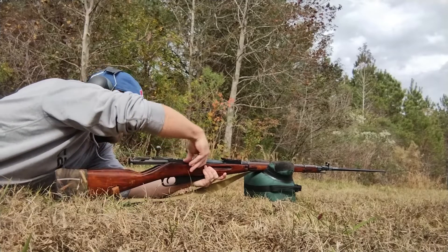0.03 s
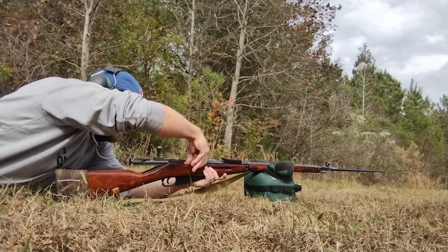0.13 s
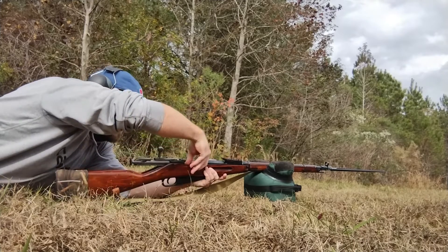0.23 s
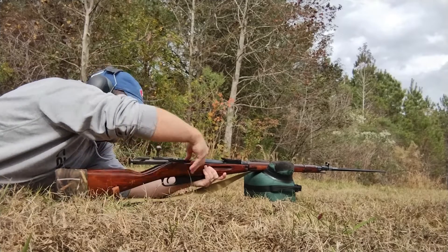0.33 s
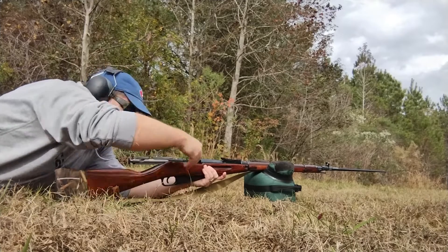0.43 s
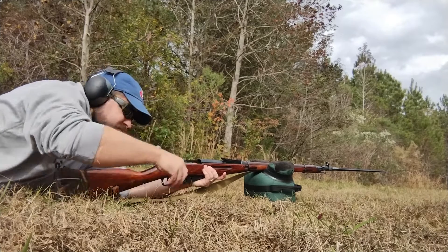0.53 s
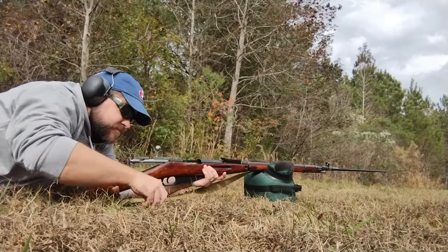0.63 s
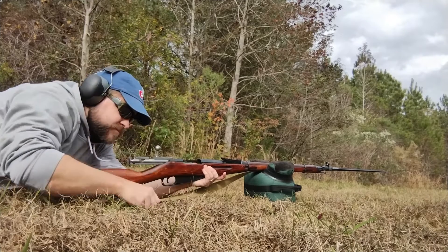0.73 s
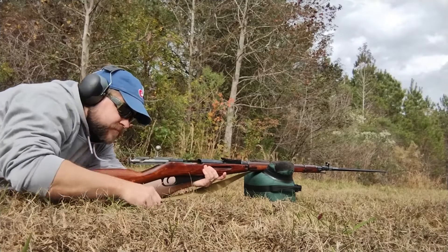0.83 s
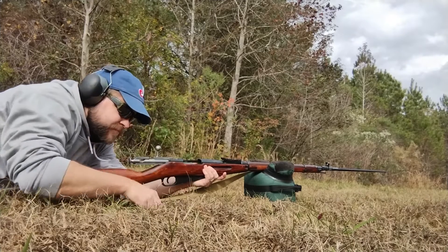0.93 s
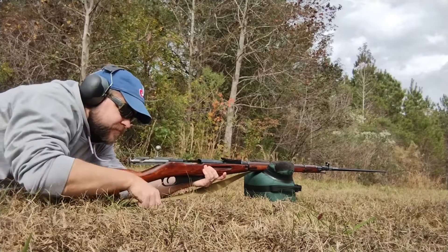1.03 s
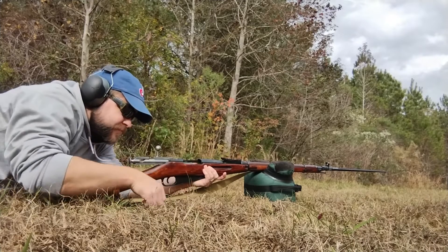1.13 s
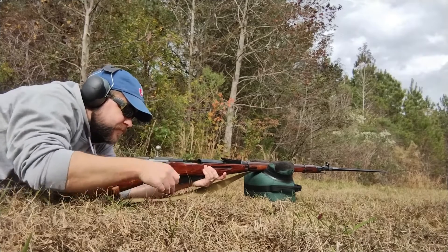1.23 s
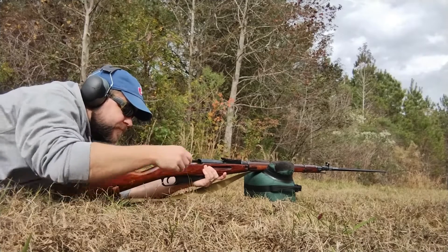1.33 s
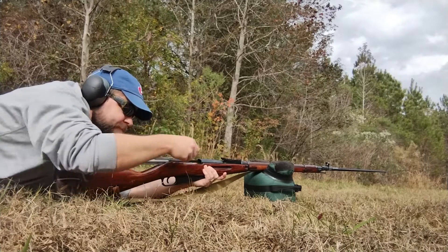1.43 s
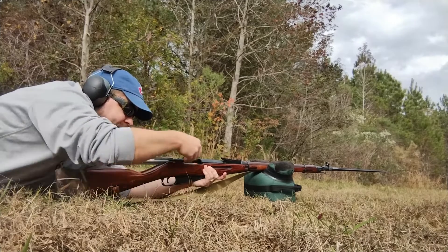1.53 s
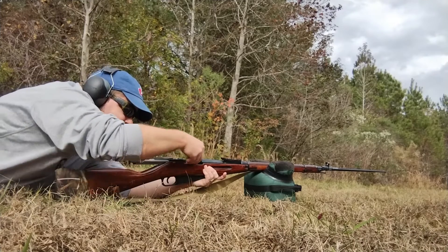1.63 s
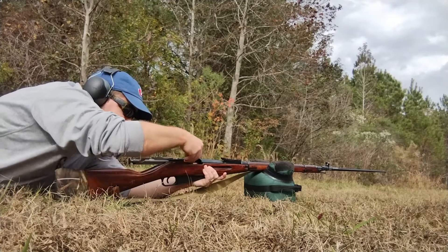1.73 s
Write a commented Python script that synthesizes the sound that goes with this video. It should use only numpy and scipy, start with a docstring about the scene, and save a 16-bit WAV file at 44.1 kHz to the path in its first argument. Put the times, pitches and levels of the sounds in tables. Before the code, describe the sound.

A rifle bolt clacks sharply in a quick metallic burst outdoors, then near quiet with faint hum

```python
"""A rifle bolt is worked outdoors close by: short runs of steel contacts, each a burst of noise and tone through
resonances, ring the action and knock the wooden stock, and a faint broad echo follows the main run; decaying
noise tails answer from ground and tree line. A far propeller engine hums as a sum of harmonic orders. An insect
ticks steadily in the grass, by filtered noise bursts, among weaker random ticks. Behind lie faint shaped noises:
air hiss, rumble and breeze."""
import sys
import numpy as np
from scipy import signal
from scipy.fft import rfft, irfft, next_fast_len
from scipy.io import wavfile
from scipy.ndimage import uniform_filter1d, minimum_filter1d, map_coordinates

SR = 44100
rng = np.random.default_rng(int(sys.argv[2]) if len(sys.argv) > 2 else 0)


def wrap_up_sound(samples):
    """Save the sound to the file named by the first command line argument, as 16-bit audio."""
    columns = np.atleast_2d(samples).T
    # keep every value between -1 and 1, then stretch to whole-number steps
    tamed = np.clip(columns, -1, 1)
    steps = np.round(tamed * 32767).astype(np.int16)
    wavfile.write(sys.argv[1], SR, steps)


def volts(x):
    """Linear amplitude factor 10**(x/20) for a level x in dB, scalar or array-like."""
    e = np.asarray(x, float) / 20
    return 10 ** e


N = 77175  # samples
SIDE = np.array([[.5], [-.5]])  # splits a left-over-right difference between the two ports


def unit(x):
    """Normalisation to rms 1."""
    return x / np.sqrt(np.mean(x ** 2) + 1e-20)


def along(points, hz):
    """Interpolation of (frequency [Hz], value) points on a logarithmic frequency axis."""
    f, v = np.transpose(points)
    return np.interp(np.log(hz + 1), np.log(f + 1), v)


def wobble(rate):
    """Slow random modulation: a spline through normal random knots, rate of them a second."""
    knots = rng.standard_normal(int(N * rate / SR) + 4)
    return map_coordinates(knots, [np.arange(N) * rate / SR])


def filtered(x, response):
    """Linear filtering: the spectrum is multiplied by a complex frequency response."""
    m = next_fast_len(N + SR // 2)
    return irfft(rfft(x, m) * response(np.fft.rfftfreq(m, 1 / SR)), m)[..., :N]


def resonant(x, peaks, order):
    """Modal resonance: a causal sum of modes, applied order times, that keeps the rms of white noise."""
    def gain(f):
        total = 0
        for k, (centre, width, db) in enumerate(peaks):
            mode = 1j * f * width / (centre * centre - f * f + 1j * f * width)
            total = total + (-1) ** k * volts(db / order) * mode  # neighbours have opposite sign
        total = total ** order
        return total / np.sqrt(np.mean(np.abs(total) ** 2))
    return filtered(x, gain)


def noise(events):
    """Broadband excitation: ten milliseconds of white noise per event."""
    return rng.standard_normal((len(events), SR // 100))


def bursts(times, levels_db, length, wave):
    """Impulsive excitation: one row of wave per event, with a fast rise and a Gaussian fall."""
    u = np.arange(wave.shape[1]) / SR / length
    at = np.round(times * SR).astype(int)[:, None] + np.arange(wave.shape[1])
    shape = np.sqrt(u) * np.exp(-u ** 2)
    # equal energy at equal level, whatever the wave
    size = volts(levels_db) * np.linalg.norm(shape) / np.linalg.norm(shape * wave, axis=1)
    return np.bincount(at.ravel(), (size[:, None] * shape * wave).ravel(), N + SR)[:N]


# steel contacts and, from 0.2545 to 0.2700 s, a faint broad echo of the main burst; level offsets are further
# set by each part's own gain: (time before the common shift [s], level [dB], bright part re level [dB],
# stock knock re level [dB], receiver pitch [Hz])
CONTACTS = [(0.0398, -43, 0, -22, 4560), (0.0409, -35.5, -14, -26, 4400), (0.0722, -26, -8, -26.5, 3860),
            (0.0748, -27, -19, -28.5, 4090), (0.0779, -38, -14.5, -22.5, 3800),
            (0.0806, -38, -10, -22.5, 3850), (0.0824, -34, -8, -22.5, 4000), (0.0842, -33, -5, -19.5, 4640),
            (0.0862, -35, -8, -19, 4900), (0.0884, -33, -4.5, -21.5, 4870),
            (0.0924, -29.5, -15.5, -22.5, 4420), (0.0959, -36, -13.5, -17.5, 5020),
            (0.0994, -44.5, -17.5, -18.5, 3940), (0.1028, -44, -14, -16.5, 3720),
            (0.1094, -58, -10.5, -12, 5040), (0.1908, -46, -6, -3.5, 4570), (0.195, -46, -11.5, -12, 4380),
            (0.1999, -25.5, -10, -15, 4317), (0.202, -27, -2.5, -21, 4348),
            (0.2039, -11.5, -3.5, -29, 4281), (0.2058, -6, -7.5, -26.5, 4609),
            (0.2076, -3.5, -13.5, -24, 4040), (0.2098, -6.5, -12, -23, 4628), (0.2128, -16, -12, -26, 3890),
            (0.2159, -18.5, -10.5, -19.5, 4484), (0.2196, -17, -6, -17, 4653),
            (0.2214, -8.5, -7, -23, 4252), (0.2236, -12.5, -4, -25, 3606), (0.2281, -17, -10, -21.5, 5031),
            (0.2289, -22.5, -7, -26, 4108), (0.232, -17, -10.5, -29.5, 4680),
            (0.2346, -22, -6.5, -23.5, 3599), (0.2389, -27.5, -11, -13, 3280),
            (0.2427, -29.5, -11.5, -16, 3802), (0.2479, -35.5, -8.5, -14.5, 3952),
            (0.2545, -43, -1.5, -11, 3600), (0.261, -47, 0.5, -7, 4330), (0.2700, -50.5, -1.5, -7.5, 3720),
            (0.3706, -51.5, -16, -14, 3860), (0.3785, -49, -21, -13, 3910),
            (0.3909, -28, -10.5, -15.5, 4505), (0.3938, -36.5, -20, -44, 4330),
            (0.3965, -35, -7, -19.5, 4280), (0.3983, -38.5, -16, -27, 4500),
            (0.3999, -27.5, -11, -22, 4768), (0.4054, -49, -25, -5, 4257), (0.4124, -53, -16, -7, 4955),
            (0.4164, -64, -24, -30, 4546), (1.5505, -68, -6, -16, 4130)]


def bolt():
    """Impact excitation: every row drives the small parts, the receiver and the stock."""
    s, db, bright_db, stock_db, hz = np.transpose(CONTACTS)
    s = s + .0002  # common shift, s
    receiver_s = s + 0.00054  # the receiver speaks a moment later
    return ping(receiver_s, db, hz) + scrape(receiver_s, db) + snap(s, db + bright_db) + knock(s, db + stock_db)


STEEL_S = .0014  # burst length of ping and scrape
# the receiver radiates little bass: (frequency [Hz], width per pass [Hz], relative level [dB])
PING_BAND = [(3987, 4000, 0)]


def ping(s, db, hz):
    """Tonal ringing with phase diffusion: a random walk of phase broadens each sinusoid."""
    PING_DB, WAVER = -8.5, 0.12  # waver: rms radians a sample
    phase = 2 * np.pi * hz[:, None] * np.arange(SR // 100) / SR
    wave = np.sin(phase + WAVER * np.cumsum(noise(s), axis=1))
    return resonant(bursts(s, db + PING_DB, STEEL_S, wave), PING_BAND, order=2)


# modes of the receiver as a whole: (frequency [Hz], width per pass [Hz], relative level [dB])
STEEL = [(2652, 1200, -2.5), (3700, 900, 3.5), (5230, 860, -3)]


def scrape(s, db):
    """Friction noise coloured by the modes of the receiver."""
    SCRAPE_DB = -8
    return resonant(bursts(s, db + SCRAPE_DB, STEEL_S, noise(s)), STEEL, order=2)


# modes of the small bolt parts: (frequency [Hz], width [Hz], relative level [dB])
BRIGHT = [(6420, 3900, -4), (7750, 1700, 3), (10065, 500, -3), (12250, 1800, -0.5), (13400, 3800, -5)]


def snap(s, db):
    """Modal radiation of small parts: their high, broad modes turn the impact noise into a bright snap."""
    SNAP_DB, SNAP_S = 6.5, 0.0013
    return resonant(bursts(s, db + SNAP_DB, SNAP_S, noise(s)), BRIGHT, order=1)


# modes of the wooden stock: (frequency [Hz], width [Hz], relative level [dB]); grip() uses the lowest three
STOCK = [(390, 160, -3), (560, 66, 3), (735, 200, -3.5), (990, 200, -2.5), (1337, 200, 2.5)]
# the wood radiates little treble: (frequency [Hz], width per pass [Hz], relative level [dB])
STOCK_BAND = [(750, 1170, 0)]


def knock(s, db):
    """Structure-borne sound: the impact excites the modes of the wood, which radiates a limited band."""
    KNOCK_DB, KNOCK_S = -4.5, 0.0015
    wood = resonant(bursts(s, db + KNOCK_DB, KNOCK_S, noise(s)), STOCK, order=1)
    return resonant(wood, STOCK_BAND, order=2)


# a hand settles on the stock: (time [s], level [dB])
GRIP = [(1.734, -57.5), (1.742, -58.5)]


def grip():
    """Soft impact: longer bursts in the lowest modes of the wood alone."""
    s, db = np.transpose(GRIP)
    return resonant(bursts(s, db, .005, noise(s)), STOCK[:3], order=2)


def radiated(x):
    """Radiation efficiency: a small source is a weak bass radiator, here a second-order high-pass."""
    LOW_HZ = 199.9
    return filtered(x, lambda hz: (1j * hz / (LOW_HZ + 1j * hz)) ** 2)


# level difference between the ports: (frequency [Hz], left over right [dB])
HIT_BALANCE = [(60, -3), (180, -4), (550, -1.5), (1650, 3.5), (4970, 2.5), (15000, 7.5)]
# phase difference between the ports: (frequency [Hz], left lead [radians])
LEFT_LEAD = [(500, 1.7), (1400, 0.63), (2800, 0.36), (5600, 0.94), (11000, 1.3)]


def direct(steel, unlike):
    """Interaural-type cues: level and phase differences, and a part that is opposite at the two ports."""
    UNLIKE_DB = -12.5

    def port(hz):
        return volts(SIDE * along(HIT_BALANCE, hz)) * np.exp(1j * SIDE * along(LEFT_LEAD, hz))
    return filtered(steel + 2 * SIDE * volts(UNLIKE_DB) * unlike, port)


def echo(x, t60s, delay_s):
    """Diffuse reverberation: convolution with a half-second noise tail, each frequency decaying at its t60."""
    hz, t, z = signal.stft(rng.standard_normal((2, SR // 2)), SR, nperseg=128)
    tail = signal.istft(z * volts(-60 * t / along(t60s, hz)[:, None]), SR, nperseg=128)[1]
    delayed = np.pad(x, (round(delay_s * SR), 0))[None]
    return signal.fftconvolve(delayed, tail / np.linalg.norm(tail[0]), axes=1)[:, :N]


# first scatter off grass and hands: (frequency [Hz], t60 [s])
GROUND = [(1000, 0.017)]


def ground(steel):
    """Early scattering: a very short diffuse tail just behind the direct sound."""
    return volts(-10.5) * echo(steel, GROUND, 0.00044)


# ground and rest: (frequency [Hz], t60 [s])
NEAR = [(300, 0.13), (1400, .1), (4000, 0.21), (14000, 0.062)]


def near(steel):
    """Local reverberation: a diffuse tail from the near surroundings."""
    return volts(-21.5) * echo(steel, NEAR, 0.0026)


# decay of the tree line: (frequency [Hz], t60 [s])
TREES = [(300, .7), (1500, 1.0), (4000, 1.0), (8000, 0.86), (14000, 0.15)]
# what the trees send back: (frequency [Hz], gain [dB])
TREES_COLOUR = [(500, -2), (2000, 2.5), (4200, -5), (5800, 2), (7800, 2), (14000, -2.5)]


def trees(steel):
    """Frequency-dependent scattering: the tree line colours the sound and returns it as a long tail."""
    sent_back = filtered(steel, lambda hz: volts(along(TREES_COLOUR, hz)))
    return volts(-40) * echo(sent_back, TREES, 0.013)


def blurred(x):
    """Phase modulation by moving scatterers: stirring leaves and grass let no pitch last."""
    WAVER, RATE = 3, 150  # radians rms at the knots, knots a second
    drift = WAVER * np.array([wobble(RATE), wobble(RATE)])
    return np.real(signal.hilbert(x, next_fast_len(N))[:, :N] * np.exp(1j * drift))


# engine orders, all raised 1 dB in engine(): (multiple of the pulse rate, level before the turn [dB],
# level after it [dB])
ENGINE = [(1, -93.5, -87), (2, -70.5, -70), (3, -63.5, -62), (4, -71.5, -66.5), (4.5, -88.5, -75),
          (5, -88, -90), (6, -66.5, -72), (7, -91.5, -83)]


def engine():
    """Harmonic synthesis: orders of one pulse train, whose balance shifts as the far engine turns."""
    PULSE_HZ, FIRST_PULSE_S, TURN_S, TURN_WIDTH_S = 45.5, 0.0097, 1.25, 0.078
    t = np.arange(N) / SR
    turned = 1 / (1 + np.exp((TURN_S - t) / TURN_WIDTH_S))
    cycle = 2 * np.pi * PULSE_HZ * (t - FIRST_PULSE_S)
    tone = np.zeros(N)
    for multiple, before, after in ENGINE:
        level = volts(before + (after - before) * turned + 1 + 0.5 * wobble(3.9))
        tone += level * np.cos(multiple * cycle + .25 * wobble(4.8))
    port_level = np.array([volts(0.74 * wobble(2.0)), volts(0.54 * wobble(3.6))])
    return tone * port_level * volts([[-.6], [.6]])


# resonances of the ticks: (frequency [Hz], width per pass [Hz], relative level [dB])
TICK = [(12400, 830, -10.5), (12700, 1500, 6), (16400, 2700, -1)]


def insects():
    """Resonant radiation of pulse trains: one periodic ticker, and weaker ticks at random times."""
    PERIOD_S, FIRST_S, TICK_DB, LEFT_OVER_RIGHT_DB = .03421, .0112, -63, 6
    STRAY_PER_S, STRAY_DB = 69, -68.5  # the lowest stray level; it ranges 7 dB upward
    steady = np.arange(FIRST_S, N / SR, PERIOD_S)
    level = TICK_DB + 2.2 * rng.standard_normal(len(steady))
    ticker = bursts(steady, level, 0.0011, noise(steady))
    draw = rng.random((round(STRAY_PER_S * N / SR), 2))
    stray = bursts(draw[:, 0] * N / SR, STRAY_DB + 7 * draw[:, 1], 0.00088, noise(draw))
    return resonant(ticker + stray, TICK, order=2) * volts(SIDE * LEFT_OVER_RIGHT_DB)


def hiss(spectrum, shared):
    """Partial coherence: stereo noise of rms 1, a share of its power common to both ports."""
    a = rng.standard_normal((3, N))
    mixed = np.sqrt(shared) * a[0] + np.sqrt(1 - shared) * a[1:]
    return unit(filtered(mixed, lambda hz: volts(along(spectrum, hz))))


# air hiss spectrum: (frequency [Hz], relative level per Hz [dB])
AIR = [(180, -32), (300, -4.5), (321, -12.5), (366, -13), (645, -17.5), (713, -18), (978, -21.5),
       (10000, -28), (13500, -27), (16000, -24.5)]
# rumble spectrum: (frequency [Hz], relative level per Hz [dB])
RUMBLE = [(15, -50.5), (28, -32.5), (45, -21.5), (70, -3.5), (110, -1), (200, -6), (300, -14.5),
          (500, -30.5), (800, -91.5)]
# far insects lift the left treble: (frequency [Hz], left over right [dB])
AIR_LEFT = [(9000, 0.5), (13000, 6.5)]


def air():
    """Partially coherent noise fields: nearly incoherent hiss that slowly fades, and coherent rumble."""
    AIR_DB, FADE_DB_PER_S, RUMBLE_DB = -70, 2.5, -70
    air_level = volts(AIR_DB - FADE_DB_PER_S * np.arange(N) / SR + 0.55 * wobble(3))
    rumble_level = volts(RUMBLE_DB + 1.5 * wobble(4.3))
    both = air_level * hiss(AIR, 0.027) + rumble_level * hiss(RUMBLE, 0.82)
    return filtered(both, lambda hz: volts(SIDE * along(AIR_LEFT, hz)))


# breeze on each port: (frequency [Hz], relative level per Hz [dB])
BUFFET = [(12, -22), (25, -0.5), (45, -5.5), (80, -30), (150, -88.5)]


def buffet():
    """Turbulent pressure: low noise of the breeze, mostly incoherent between the ports."""
    return volts(-87 + 1.8 * wobble(7)) * hiss(BUFFET, 0.12)


def scene():
    """Superposition: all sources add at the two microphone ports."""
    steel, unlike = radiated(np.array([bolt() + grip(), bolt()]))
    space = ground(steel) + blurred(near(steel) + trees(steel))
    return direct(steel, unlike) + space + engine() + insects() + air() + buffet()


def limited(x):
    """Peak limiting: a gain common to both ports eases down around the highest peaks."""
    LIMIT, SPAN_S = .9, .002
    span = round(SPAN_S * SR)
    need = np.minimum(1, LIMIT / (np.abs(x).max(axis=0) + 1e-9))
    return x * uniform_filter1d(minimum_filter1d(need, 2 * span), span)


def band_limit(x):
    """A steep low-pass at the top of the band."""
    return signal.sosfilt(signal.butter(12, 16310, fs=SR, output="sos"), x)


def record(dry):
    """Band limitation: a smooth low-pass, then peak limiting, complete the mix."""
    TOP_HZ, SLOPE_HZ = 16000, 240
    band = filtered(dry, lambda hz: (1 - np.tanh((hz - TOP_HZ) / SLOPE_HZ)) / 2)
    mix = limited(band)
    return band_limit(mix)


dry = scene()
out = record(dry)
wrap_up_sound(out)
```